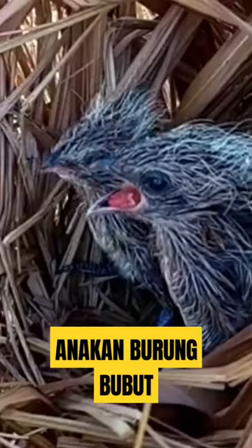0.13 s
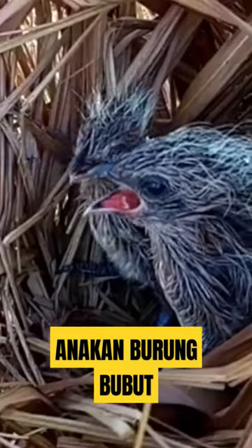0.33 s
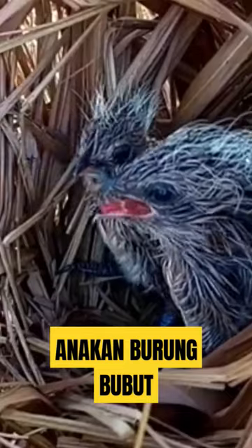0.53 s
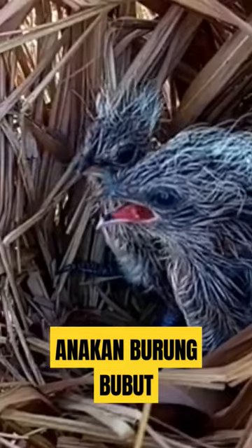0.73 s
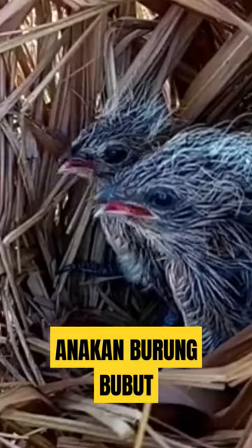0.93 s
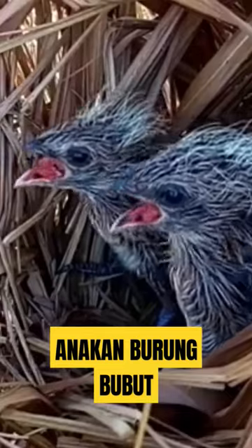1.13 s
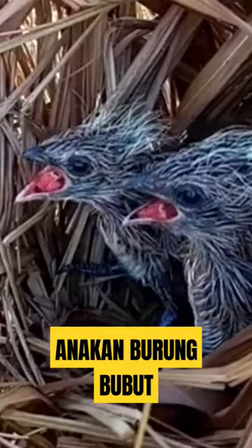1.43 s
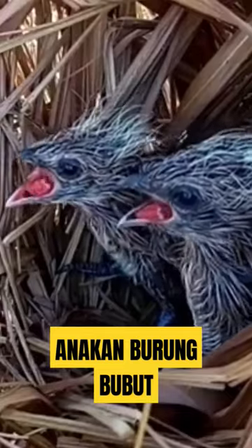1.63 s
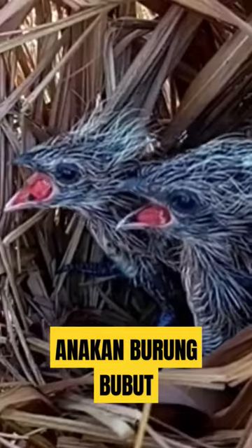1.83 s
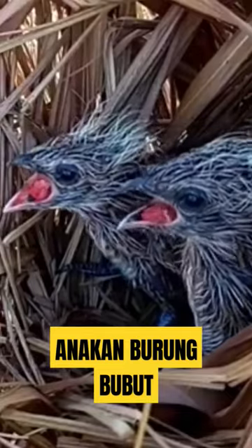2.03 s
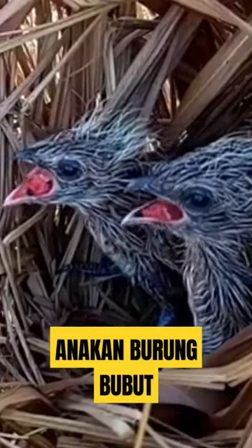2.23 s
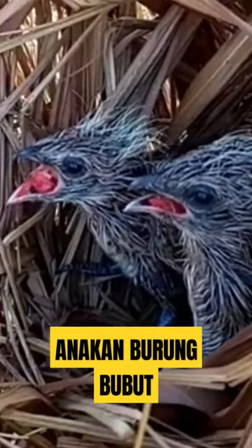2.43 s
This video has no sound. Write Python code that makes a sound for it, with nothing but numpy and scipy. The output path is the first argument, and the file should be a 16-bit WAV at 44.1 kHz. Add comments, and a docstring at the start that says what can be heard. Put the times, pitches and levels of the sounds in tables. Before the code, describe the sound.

Two baby birds beg close to the microphone, first with uneven raspy cries, then steady hissing pulses about six a second; a few beak clicks, faint straw rustle, low wind rumble and distant insects outdoors.

```python
"""A nest outdoors: two nestlings beg close to the microphone, settling into about six calls a second.
Harsh hisses are noise coloured by the open beak; rasping cries are arched, jittery harmonics through a throat.
Clicks are decaying beak modes; straw rustles and soft bumps are noise bursts; the nest adds a brief noise tail.
Far insects and small birds are gliding sine tones; still air and buffeting wind are coloured noise."""
import sys
import numpy as np
from scipy import signal
from scipy.fft import rfft, irfft
from scipy.io import wavfile
from scipy.ndimage import uniform_filter1d

SR = 44100
rng = np.random.default_rng(int(sys.argv[2]) if len(sys.argv) > 2 else 0)


def dump(signal):
    """Clip the signal to [-1, 1] and save it as 16-bit WAV at the path in sys.argv[1]."""
    limited = np.clip(np.atleast_2d(signal).T, -1, 1)
    pcm = np.round(limited * 32767).astype(np.int16)
    wavfile.write(sys.argv[1], SR, pcm)


N = 114219


def undb(db):
    """Decibels to amplitude gain."""
    return 10 ** (np.asarray(db) / 20)


def unit(x):
    """Scale to rms 1."""
    return x / np.sqrt(np.mean(x ** 2))


def response(outline, hz):
    """Gain of a (frequency, dB) outline, interpolated over log frequency."""
    outline_hz, outline_db = np.array(outline).T
    return undb(np.interp(np.log(hz + 1e-6), np.log(outline_hz), outline_db))


def filtered_noise(gain):
    """White noise shaped by a gain per FFT bin, rms 1."""
    return unit(irfft(rfft(rng.standard_normal(N)) * gain, N))


def noise(outline):
    """Noise coloured by a (frequency, dB) outline, rms 1."""
    return filtered_noise(response(outline, np.arange(N // 2 + 1) * SR / N))


def wobble(rate_hz):
    """Random modulation, Gaussian low-pass at rate_hz, rms 1."""
    hz = np.arange(N // 2 + 1) * SR / N
    return filtered_noise(np.exp(-(hz / rate_hz) ** 2))


def tone(hz):
    """Unit sine following an instantaneous frequency."""
    return np.sin(2 * np.pi * np.cumsum(hz) / SR)


def bursts(t, rows, attack_s, release_s):
    """Linear attack, hold and exponential release per (start, length, dB) row, summed in power."""
    power = np.zeros(N)
    for start_s, length_s, db in rows:
        attack = np.clip((t - start_s) / attack_s, 0, 1)
        release = np.exp(-np.maximum(t - start_s - length_s, 0) / release_s)
        power += (undb(db) * attack * release) ** 2
    return np.sqrt(power)


# log-pitch slopes at steepness 1; the crest is rounded
PITCH_RISE_PER_S, PITCH_FALL_PER_S, CREST_ROUND_S = 6.0, 4.2, 0.014
# modulation depths at rasp 1
JITTER, JITTER_HZ, SHIMMER = .03, 800, .3
WAVER, WAVER_HZ = .02, 110
TRILL_HZ, TRILL_DEPTH, ROOT_FLUTTER_DB = 135, .55, 4.5
BREATH_DB, SWELL_POWER = -10.5, 1.61
# cries: (crest [s], rise [s], fall [s], crest pitch [Hz], arch steepness [1], overtone gain [dB],
#         brightness [dB/octave], fundamental level [dB], rasp [0-1])
CRIES = [(.128, 0.021, 0.044, 983, 1.37, -41.5, -0.5, -44.5, 0.86),
         (.268, 0.033, 0.059, 1091, 1.0, -31.5, -0.5, -42.5, 0.48),
         (.485, .033, 0.063, 933, 1.57, -79, -4, -44, 0.62),
         (0.586, .06, 0.074, 1190, .6, -77, -7, -49.5, 1),
         (.654, 0.041, 0.055, 1018, 0.91, -35.5, -3.5, -41, 0.31),
         (.745, .035, 0.055, 962, 0.7, -51, 2, -51, 0.64),
         (0.839, 0.034, 0.047, 939, 0.71, -40.5, -3, -45.5, 0.5),
         (.97, .05, 0.061, 1035, 0.3, -75, -2, -53.5, 0.97),
         (1.222, .024, 0.058, 923, 1.27, -48, -17, -52.5, 0.58),
         (1.377, .04, 0.054, 1042, .8, -34.5, -9, -49, 0.23),
         (1.531, .033, 0.057, 1073, 1.2, -30.5, -4.5, -51, 0.2),
         (1.699, 0.037, 0.074, 1103, 0.98, -30.5, -5, -55, 0.34),
         (1.858, 0.035, 0.067, 1120, 1.03, -30.5, 0, -59, 0.3),
         (2.017, 0.033, 0.064, 1134, 1.7, -31.5, -1, -48, 0.57),
         (2.181, .038, 0.067, 1138, 1.7, -29, -2.5, -53, 0.53),
         (2.349, 0.021, 0.062, 998, 0.82, -45.5, 2, -63, 0.9),
         (2.535, .025, 0.045, 1050, .8, -46.5, -2, -68, .6)]
# throat resonances: (frequency [Hz], gain [dB])
THROAT = [(1800, -19.5), (2300, -28), (2600, -27), (3000, -6), (3350, -22.5), (3800, -15.5), (4350, -2),
          (4900, -10.5), (5500, -2), (6300, -6.5), (7400, -18), (9000, -15), (10300, -52), (11150, 4),
          (11750, -27.5), (12500, -45), (14400, -21), (16000, -30)]


def cries(t):
    """Overtones of an arched pitch sweep through throat resonances; rasp adds jitter, trill and pulsing air."""
    out = np.zeros(N)
    k = np.arange(2, 17)[:, None]  # overtone numbers
    jitter, shimmer = wobble(JITTER_HZ), wobble(JITTER_HZ)
    waver, flutter = wobble(WAVER_HZ), wobble(WAVER_HZ)
    air = noise(THROAT)
    for crest_s, rise_s, fall_s, top_hz, steep, db, bright_db, root_db, rasp in CRIES:
        on = (t > crest_s - rise_s) & (t < crest_s + fall_s)
        d = t[on] - crest_s
        slope = np.where(d < 0, PITCH_RISE_PER_S, PITCH_FALL_PER_S)
        sag = slope * (np.hypot(d, CREST_ROUND_S) - CREST_ROUND_S)
        hz = top_hz * np.exp(-steep * sag)
        unsteady = 1 + rasp * (JITTER * jitter[on] + WAVER * waver[on])
        phase = 2 * np.pi * np.cumsum(hz * unsteady) / SR
        swell = np.maximum(np.cos(np.pi / 2 * d / np.where(d < 0, rise_s, fall_s)), 0)

        tilt = undb(bright_db * np.log2(k / 4))
        partials = np.sin(k * phase + rng.uniform(0, 2 * np.pi, k.shape))
        overtones = (response(THROAT, k * hz) * tilt * partials).sum(0)
        air_pulse = 2 * (1 + np.cos(phase))
        breath = rasp * undb(BREATH_DB) * air[on] * air_pulse
        root = unit(np.sin(phase) * undb(rasp * ROOT_FLUTTER_DB * flutter[on]))

        trill = TRILL_DEPTH * np.sin(2 * np.pi * TRILL_HZ * d)
        rough = 1 + rasp * (SHIMMER * shimmer[on] + trill)
        upper = undb(db) * swell ** SWELL_POWER * (overtones + breath)
        out[on] += rough * (upper + undb(root_db) * swell * root)
    return out


HISS_ATTACK_S, HISS_RELEASE_S, HISS_FLUTTER_DB, FLUTTER_HZ = 0.0082, 0.0035, 1.5, 332
# hisses: (start [s], length [s], level [dB])
HISSES = [(0.572, .008, -38.5), (1.308, 0.074, -38), (1.347, 0.052, -35), (1.374, 0.044, -45),
          (1.452, .018, -35.5), (1.465, 0.024, -30), (1.492, 0.089, -36.5), (1.633, 0.056, -33),
          (1.67, 0.072, -39.5), (1.792, 0.013, -30.5), (1.802, 0.025, -27.5), (1.824, 0.08, -40.5),
          (1.955, .036, -29.5), (1.988, 0.074, -38.5), (2.12, .016, -31.5), (2.132, .022, -28),
          (2.153, 0.077, -42.5), (2.288, 0.04, -29), (2.326, 0.07, -37.5), (2.388, 0.023, -34),
          (2.4, 0.015, -28), (2.476, 0.038, -28.5), (2.527, 0.044, -39), (2.567, .04, -31.5)]
# open-beak resonances: (frequency [Hz], gain [dB])
BEAK = [(400, -30.5), (1400, -26.5), (2700, -30.5), (3500, -26.5), (4000, -19.5), (5000, -20),
        (6300, -10.5), (6750, -18), (7200, -5), (8300, -13.5), (9400, -18), (10300, -9), (10850, -5),
        (11200, 3), (11500, -6.5), (11900, -25), (14000, -26.5), (16000, -30)]


def hisses(t):
    """Turbulent, fluttering air coloured by the open beak."""
    air = unit(noise(BEAK) * undb(HISS_FLUTTER_DB * wobble(FLUTTER_HZ)))
    return bursts(t, HISSES, HISS_ATTACK_S, HISS_RELEASE_S) * air


CLICK_PUSH_S = 0.00081
CLICK_GAIN = 2 * undb(2.5)  # on top of the table levels
# beak clicks: (start [s], level before CLICK_GAIN [dB])
CLICKS = [(0.9563, -11.5), (2.1416, -17), (2.4867, -17.5)]
# beak modes: (frequency [Hz], relative level [dB], T60 [s])
CLICK_MODES = [(11200, -3.5, 0.014), (10300, -6, 0.0054), (7380, -8.5, 0.0069), (8240, -8.5, 0.0039),
               (4840, -19.5, 0.0058), (14000, -25, .003)]


def clicks(t):
    """A soft-edged snap excites beak modes that ring for milliseconds."""
    out = np.zeros(N)
    for start_s, db in CLICKS:
        age = np.clip(t - start_s, 0, .1)
        push = 1 - np.exp(-(age / CLICK_PUSH_S) ** 2)
        for hz, mode_db, t60_s in CLICK_MODES:
            decay = np.exp(-np.log(1000) * age / t60_s)
            out += CLICK_GAIN * undb(db + mode_db) * push * decay * np.sin(2 * np.pi * hz * age)
    return out


# straw rustles: (start [s], length [s], level [dB])
RUSTLES = [(0.117, 0.0076, -42), (1.11, .055, -41.5), (1.17, 0.036, -45.5), (1.22, 0.005, -33.5),
           (1.247, 0.058, -43.5)]
# straw colour: (frequency [Hz], gain [dB])
STRAW = [(500, -14), (2000, -14), (3500, -13), (5800, 3.5), (7500, -1), (9500, -11), (11200, 11.5),
         (12500, -10), (16000, -5)]


def straw(t):
    """Dry leaves crackle under the shifting chicks: noise with fast random level."""
    crackle = unit(noise(STRAW) * undb(4.3 * wobble(2100)))
    return bursts(t, RUSTLES, attack_s=0.0018, release_s=0.0051) * crackle


# soft bumps: (start [s], length [s], level [dB])
BUMPS = [(0.579, 0.013, -43.5), (1.211, .012, -43.5), (1.444, 0.011, -47), (1.625, 0.018, -47),
         (1.796, 0.061, -48.5), (1.958, 0.011, -41.5), (2.005, 0.019, -40.5), (2.156, 0.02, -44.5),
         (2.29, .016, -45.5), (2.43, 0.0076, -48)]
# bump colour: (frequency [Hz], gain [dB])
BUMP_COLOUR = [(120, -32), (250, -5), (420, 7), (600, -8), (900, -18), (1400, -24), (3000, -31)]


def bumps(t):
    """Movement close to the microphone gives dull, soft knocks of low noise."""
    return bursts(t, BUMPS, attack_s=0.0068, release_s=0.011) * noise(BUMP_COLOUR)


NEST_T60_S, NEST_DB = 0.13, -9.5


def nest(x, t):
    """Straw and leaves scatter sound into a brief, decaying noise tail."""
    age = t[:SR // 3]
    decay = np.exp(-np.log(1000) * age / NEST_T60_S)
    tail = rng.standard_normal(len(age)) * decay * (age > .002)
    return x + undb(NEST_DB) * signal.fftconvolve(x, tail / np.linalg.norm(tail))[:N]


PEEP_S, PEEP_LENGTH_S, PEEP_HZ, PEEP_ARCH, PEEP_DB = 0.1448, 0.043, 2257, 0.23, -36


def peep(t):
    """One small-bird whistle; pitch and level arch together."""
    arch = np.sin(np.pi * np.clip((t - PEEP_S) / PEEP_LENGTH_S, 0, 1))
    hz = PEEP_HZ * (1 - PEEP_ARCH * (1 - arch) + .012 * wobble(300))
    return undb(PEEP_DB) * arch * tone(hz)


BUZZ_HZ, BUZZ_SWING_HZ, BUZZ_RATE_HZ = 5220, 322, 150
CHIP_S, CHIP_HZ, CHIP_FALL_HZ_PER_S = 0.033, 7600, 11000
# buzzy notes: (start [s], length [s], rms level [dB])
BUZZES = [(0.492, 0.065, -53), (0.674, 0.031, -48), (0.881, 0.022, -48.5), (0.956, 0.062, -51.5),
          (1.273, 0.061, -50), (1.423, 0.079, -47.5), (1.589, 0.079, -49), (1.755, .04, -54.5),
          (2.448, 0.079, -53), (2.518, 0.042, -50)]
# high chips: (start [s], peak level [dB])
CHIPS = [(.448, -53), (0.487, -49), (.685, -47), (.875, -48), (0.917, -47), (1.07, -48), (1.113, -43.5),
         (1.294, -48)]


def far_birds(t):
    """Fast frequency modulation makes warbling buzzes; falling sines make thin chips."""
    swing = np.sin(2 * np.pi * BUZZ_RATE_HZ * t) + 0.574 * wobble(710)
    buzz = np.sqrt(2) * tone(BUZZ_HZ + BUZZ_SWING_HZ * swing)
    out = bursts(t, BUZZES, attack_s=0.0069, release_s=0.01) * buzz
    for start_s, db in CHIPS:
        age = np.clip(t - start_s, 0, CHIP_S)
        hz = CHIP_HZ - CHIP_FALL_HZ_PER_S * age + 110 * wobble(460)
        out += undb(db) * np.sin(np.pi * age / CHIP_S) * tone(hz)
    return out


WHINE_HZ, WHINE_DB, WHINE_SPREAD_HZ = 6450, -57, 45
CRICKET_HZ, CRICKET_SWEEP_HZ, CHIRPS_PER_S, CHIRP_DEPTH = 8330, 70, 19, 0.54
# cricket bouts: (start [s], length [s], level [dB])
CRICKET_BOUTS = [(.1, 0.24, -54), (0.677, 0.75, -54), (1.34, 1.1, -58)]


def insects(t):
    """One far insect holds a thin unsteady whine; a cricket pulses in bouts, each chirp sliding down."""
    whine = tone(WHINE_HZ + WHINE_SPREAD_HZ * wobble(316)) * undb(5 * wobble(39))
    cycle = np.cumsum(CHIRPS_PER_S * (1 + .25 * wobble(7.8))) / SR % 1
    hz = CRICKET_HZ + CRICKET_SWEEP_HZ * (1 - 2 * cycle) + 90 * wobble(388)
    gate = 1 - CHIRP_DEPTH * np.cos(np.pi * cycle) ** 2
    chirps = unit(gate ** 2 * tone(hz))
    bouts = bursts(t, CRICKET_BOUTS, attack_s=.01, release_s=.01)
    return undb(WHINE_DB) * unit(whine) + bouts * chirps


DEEP_GAIN_DB, BUFFET_SPREAD_DB, WIND_CUT_HZ = 0.5, 2, 44
UPPER_GAIN_DB = 0.5
# deep rumble colour: (frequency [Hz], gain [dB])
WIND = [(15, -8), (30, -11), (42, -12), (52, -8), (64, 0.5), (80, -4), (130, -5), (165, -17.5), (230, -24),
        (350, -43), (800, -93.5)]
# deep level before DEEP_GAIN_DB and the low cut: (time [s], level [dB])
GUSTS = [(0.14, -26), (0.26, -21), (0.61, -19.5), (0.64, -31), (0.72, -17.5), (0.98, -26), (1.22, -23),
         (1.33, -36), (1.44, -21.5), (1.54, -30.5), (1.65, -20.5), (1.87, -29), (1.91, -35.5),
         (1.96, -21.5), (2.24, -30), (2.33, -21), (2.48, -37), (2.59, -35)]
# upper rumble colour: (frequency [Hz], gain [dB])
BUFFET_SPECTRUM = [(140, 5), (200, -6), (255, 1.5), (340, -7.5), (480, -20.5), (650, -27), (1000, -32),
                   (2000, -52)]
# upper level before UPPER_GAIN_DB: (time [s], level [dB])
BUFFETS = [(0.16, -42.5), (0.28, -35.5), (0.38, -41.8), (0.47, -40.5), (0.58, -35.5), (0.68, -42.5),
           (0.81, -35), (0.95, -42), (1.15, -38), (1.3, -40), (1.45, -41), (1.6, -42), (1.85, -40.5),
           (2.03, -43.5), (2.18, -39), (2.3, -39.5), (2.45, -46.5), (2.56, -44.5)]


def wind(t):
    """Air buffets the microphone: deep noise follows gusts, upper noise has its own level curve."""
    rumble = noise(WIND)
    rumble = rumble / np.sqrt(uniform_filter1d(rumble ** 2, size=2200))  # even out over 50 ms
    gust_db = np.interp(t, *np.array(GUSTS).T)
    deep = rumble * undb(DEEP_GAIN_DB + gust_db + BUFFET_SPREAD_DB * wobble(8.2))
    deep = signal.sosfilt(signal.butter(3, WIND_CUT_HZ, "high", fs=SR, output="sos"), deep)
    upper_db = UPPER_GAIN_DB + np.interp(t, *np.array(BUFFETS).T)
    return deep + noise(BUFFET_SPECTRUM) * undb(upper_db)


AIR_DB = -48
# still-air colour: (frequency [Hz], gain [dB])
AIR = [(200, 8), (600, -2), (1000, 0), (1500, -4.5), (2100, 2.5), (2500, -5), (2950, -2), (3400, -8.5),
       (4100, -4.5), (4800, -0.5), (7800, -2), (9300, -8), (10700, -2.5), (11220, 15), (11800, -2.5),
       (13500, -10.5), (16000, -10)]


def still_air():
    """Steady coloured noise of the outdoor air."""
    return undb(AIR_DB) * noise(AIR)


def scene():
    """Chicks and nest movement with the nest tail, over the outdoor background."""
    t = np.arange(N) / SR
    near = nest(cries(t) + hisses(t) + straw(t) + bumps(t), t)
    far = peep(t) + far_birds(t) + insects(t)
    return (near + clicks(t) + far + wind(t) + still_air())[None]


START_S, FADE_S, TOP_HZ = .128, 0.00062, 15600


def record(dry):
    """Silence until START_S, a very short fade-in, then a steep low-pass at TOP_HZ."""
    opened = np.clip((np.arange(N) / SR - START_S) / FADE_S, 0, 1)
    return signal.sosfilt(signal.ellip(10, .2, 80, TOP_HZ, fs=SR, output="sos"), dry * opened)


dry = scene()
out = record(dry)
dump(out)
```